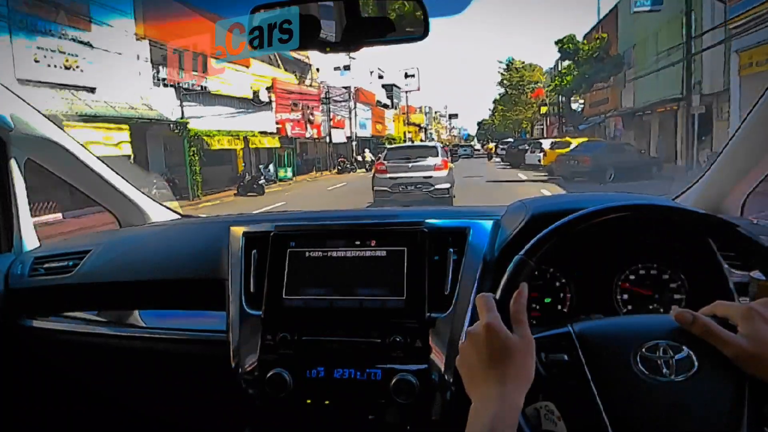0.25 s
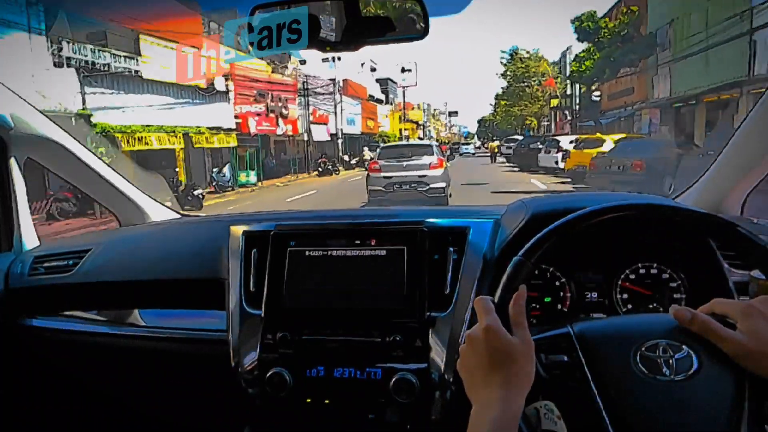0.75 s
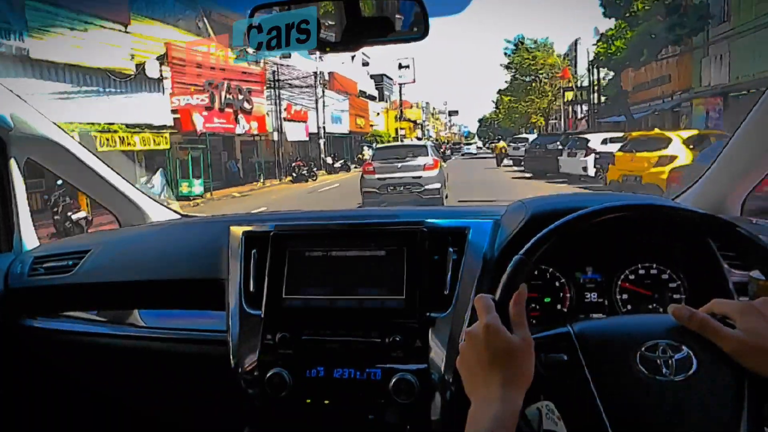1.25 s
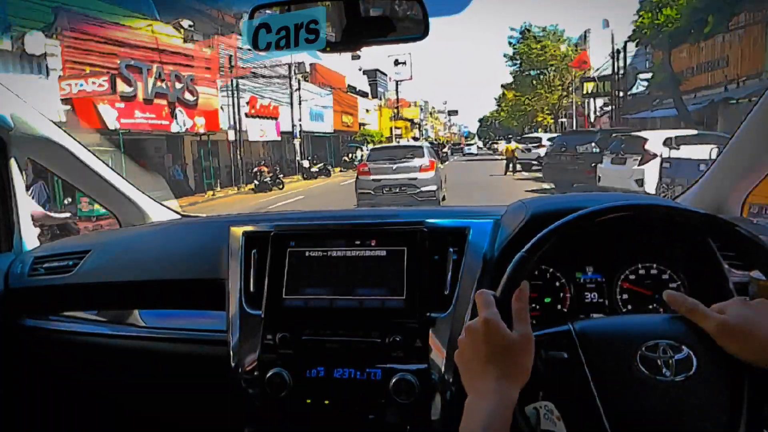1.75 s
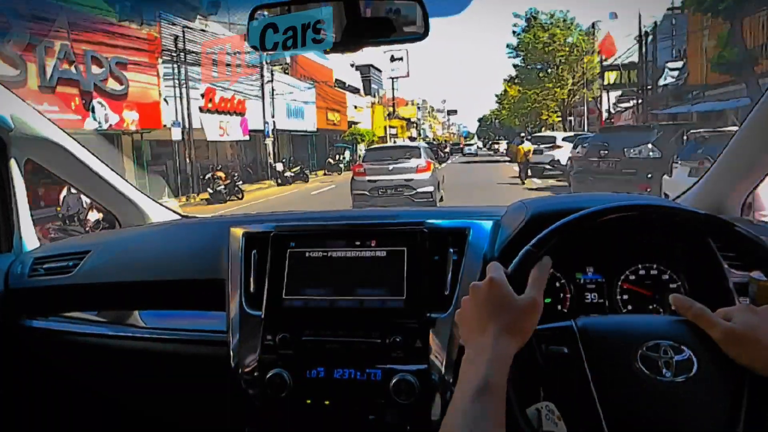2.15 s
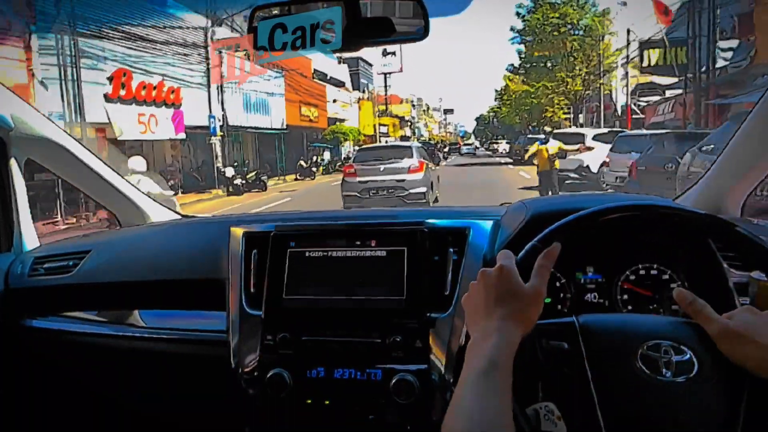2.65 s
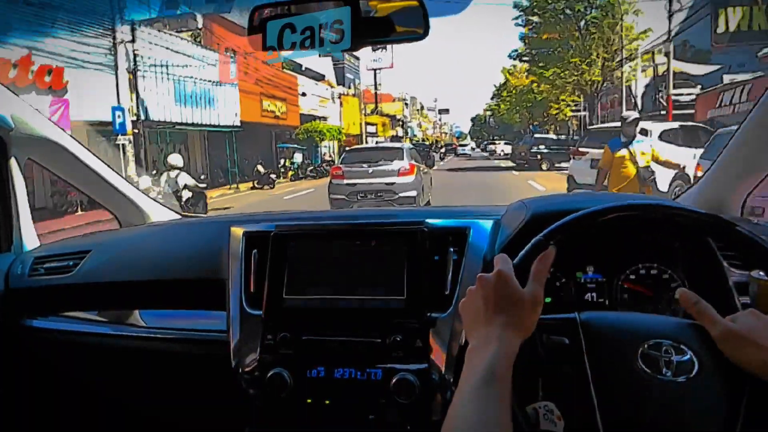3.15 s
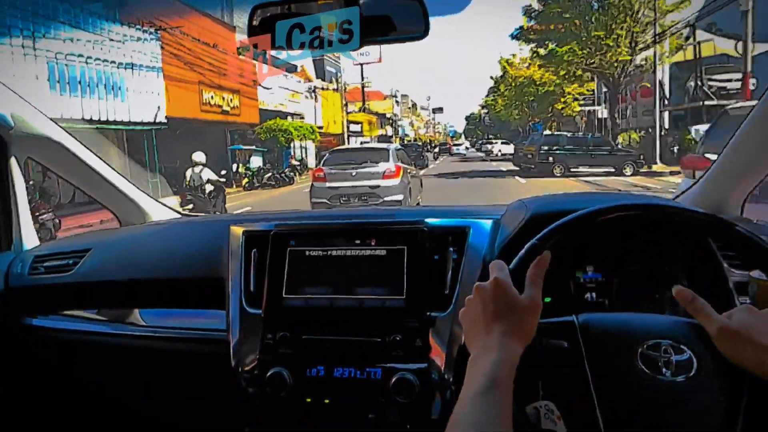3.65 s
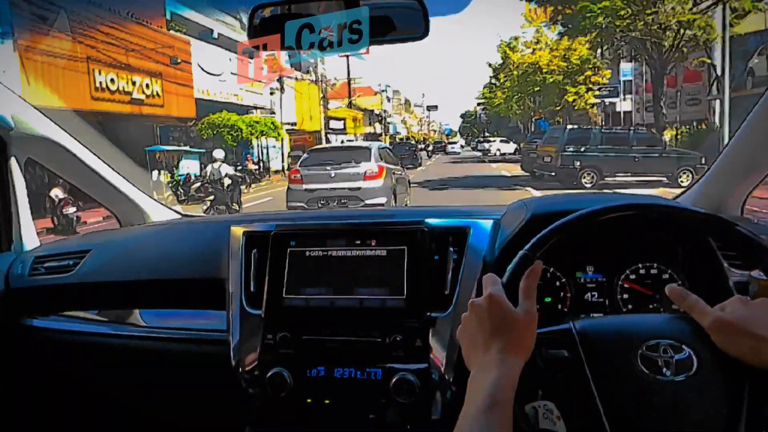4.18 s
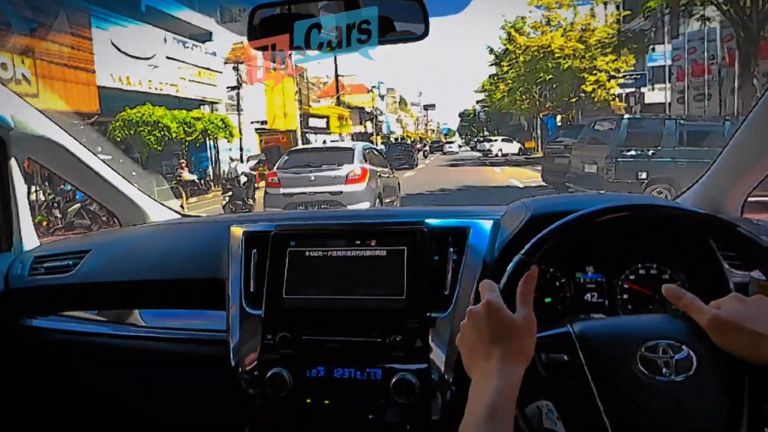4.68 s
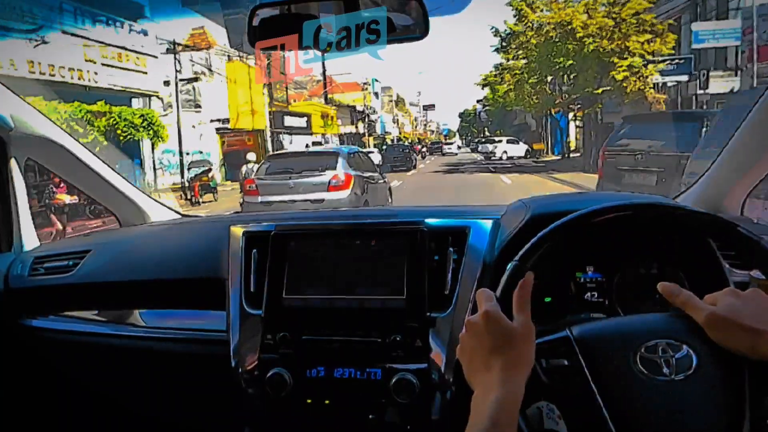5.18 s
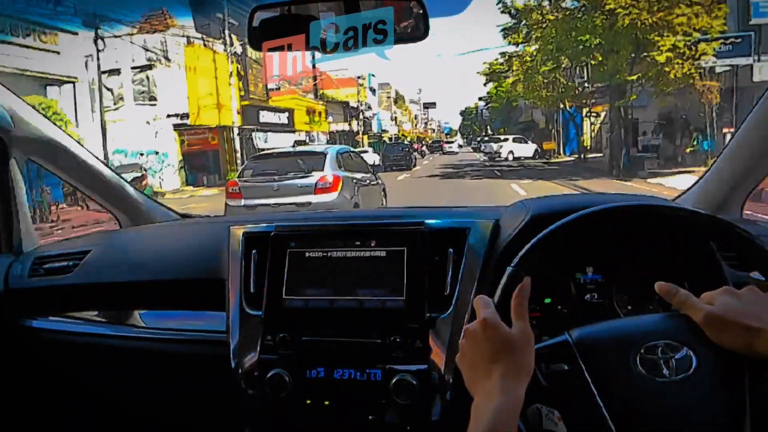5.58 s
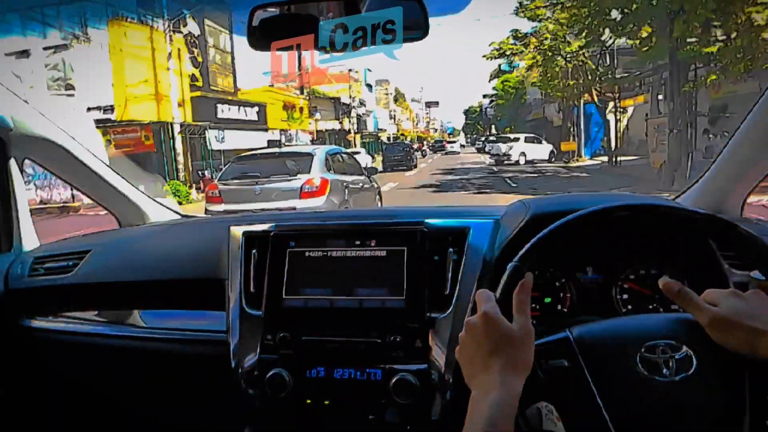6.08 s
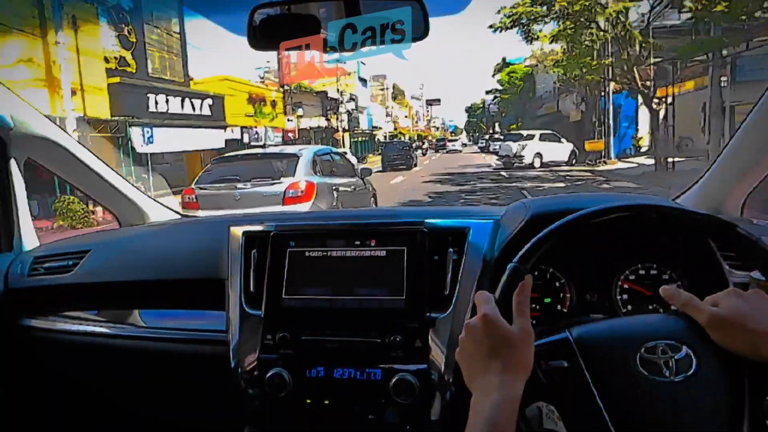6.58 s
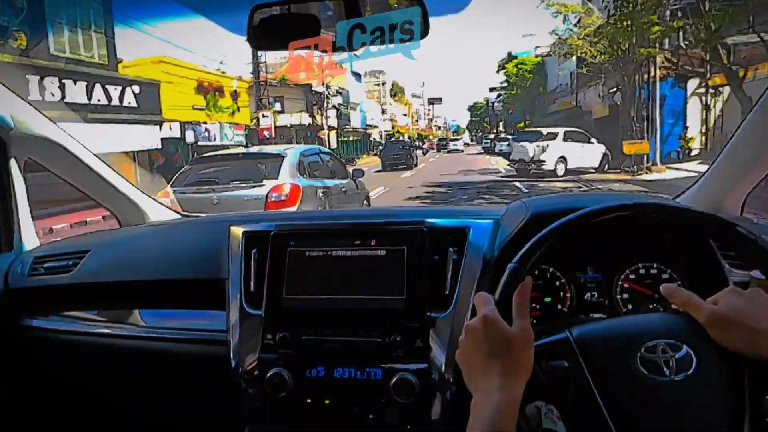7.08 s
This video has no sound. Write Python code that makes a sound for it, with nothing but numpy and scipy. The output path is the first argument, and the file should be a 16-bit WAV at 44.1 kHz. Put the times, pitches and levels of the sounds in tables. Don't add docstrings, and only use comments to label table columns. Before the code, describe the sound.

Heard from the dashboard inside a closed moving car: a continuous deep rumble that heaves unevenly with the road, booming in the cabin. Bumps cluster in the first second and a half, then come more spaced, the heaviest near three seconds. Soft suspension thuds, trim jolts, dashboard taps and tiny loose ticks scatter throughout; a hard plastic knock comes just after four seconds. Muffled tyre roar and thin microphone hiss stay underneath.

```python
import sys
import numpy as np
from scipy import signal
from scipy.fft import rfft, irfft, next_fast_len
from scipy.io import wavfile
from scipy.ndimage import uniform_filter1d, map_coordinates

SR = 44100
rng = np.random.default_rng(int(sys.argv[2]) if len(sys.argv) > 2 else 0)


def pcm_store(signal):
    levels = np.round(np.clip(np.atleast_2d(signal), -1, 1) * 32767)
    wavfile.write(sys.argv[1], SR, levels.astype(np.int16).T)


def voltage_ratio(level):
    return 10 ** (np.asarray(level, float) / 20)


N = 323253

# (time [s], unevenness [dB], grit [dB])
ROAD = [(0.0, -46, -56.5), (0.84, -40, -54), (1.04, -41, -55.5), (2.0, -45.5, -56), (2.2, -40.5, -55.5),
        (2.59, -47.5, -56.5), (2.86, -43, -58), (3.14, -43.5, -57), (3.45, -45, -55.5), (3.78, -46, -53.5),
        (4.35, -45, -54.5), (4.82, -42.5, -57), (5.2, -42, -53.5), (6.0, -46, -56.5), (6.27, -48, -53),
        (6.47, -43.5, -54.5), (6.88, -46, -53), (7.33, -45, -54.5)]
# (frequency [Hz], density [dB per Hz])
HEAVE_SPECTRUM = [(2, -10), (6, -15.5), (14, -5), (25, -5), (38, -7.5), (52, -14.5), (70, -41), (150, -120)]
# (frequency [Hz], width [Hz], level [dB])
CABIN_MODES = [(78, 15.1, 3), (106.6, 41, -7), (151.4, 47, -7), (219.3, 7.2, -7)]
# (frequency [Hz], density [dB per Hz])
SHELL_SPECTRUM = [(30, -34.5), (55, 1), (200, -11.5), (270, -15.5), (480, -21.5), (700, -41.5),
                  (1500, -120)]
# (frequency [Hz], width [Hz], level [dB])
PANEL_MODES = [(320, 40, -4), (374.3, 74, 1), (534.3, 63, -10)]
# (frequency [Hz], density [dB per Hz])
TYRE_SPECTRUM = [(260, -30.5), (450, -2.5), (565, -6.5), (715, -4), (775, -4), (878, -4.5), (1130, -7),
                 (1290, -12), (1430, -16), (1600, -20), (2600, -27), (3380, -42.5), (5720, -120)]
# (time of swing middle [s], peak [dB], swing [Hz], direction [+-1])
BUMPS = [(0.148, -27.5, 15, 1), (0.448, -34.5, 21, 1), (0.718, -25.5, 20, 1), (0.783, -35, 12, 1),
         (0.812, -33, 41, -1), (0.89, -24, 22, -1), (0.973, -33, 14, -1), (1.073, -23.5, 21.3, 1),
         (1.164, -34, 11, 1), (1.248, -25.5, 14.3, 1), (1.361, -32, 11.5, -1), (1.444, -34, 23, 1),
         (1.552, -27, 13, -1), (1.62, -27, 16, -1), (2.343, -28.5, 13, 1), (2.657, -22.5, 27, -1),
         (2.752, -29.5, 22, 1), (3.093, -19, 16.3, 1), (3.153, -30.5, 28, 1), (3.311, -29, 16, 1),
         (3.329, -26.5, 17, -1), (4.186, -27, 32.5, -1), (4.304, -32.5, 14, -1), (4.462, -26, 17, 1),
         (4.701, -28, 19, -1), (4.957, -26, 21, -1), (5.213, -26.5, 12, 1), (5.528, -33, 13.4, 1),
         (5.878, -30, 22, -1), (6.273, -28.5, 22, -1)]
# (time [s], peak [dB], pitch [Hz])
THUDS = [(0.133, -39, 174), (0.624, -39, 160), (0.705, -39.5, 168), (0.873, -42, 154), (0.963, -41, 166),
         (1.058, -42.5, 181), (1.531, -43, 134), (1.77, -40.5, 165), (2.083, -43, 137), (2.244, -44, 166),
         (2.332, -38.5, 210), (2.413, -43, 134), (2.644, -35, 154), (3.081, -31.5, 150), (4.311, -44, 158),
         (4.395, -41, 155), (4.439, -35.5, 151.4), (4.583, -50, 132), (4.689, -37.5, 204),
         (5.154, -40, 212), (6.06, -40, 182), (6.372, -39.5, 205), (6.458, -42, 148), (6.556, -38, 129),
         (6.598, -35.5, 174), (6.714, -33.5, 129), (6.924, -42, 212), (7.02, -42.5, 176), (7.186, -46, 146),
         (7.244, -42.5, 207)]
# (time [s], peak [dB], pitch [Hz])
JOLTS = [(0.13, -45.5, 369), (0.461, -36.5, 359), (0.616, -42, 288), (0.781, -40.5, 340),
         (0.863, -46.5, 421), (1.065, -47.5, 436), (1.35, -37, 393.6), (1.55, -41, 377),
         (2.087, -40.5, 357), (2.171, -47, 357), (2.214, -45, 353), (2.446, -45, 332), (2.641, -37.5, 407),
         (2.756, -42, 382), (2.799, -45, 383), (2.963, -44, 374), (3.444, -43.5, 376), (3.723, -44, 316),
         (4.313, -43.5, 308), (4.433, -39.5, 383), (4.83, -38, 368), (4.857, -46, 312), (5.097, -45.5, 360),
         (5.155, -41.5, 376), (5.57, -46, 324), (6.084, -46, 394), (6.371, -43.5, 329), (6.631, -45.5, 370),
         (6.821, -44, 400), (7.163, -39.5, 327)]
# (frequency [Hz], density [dB per Hz])
SHOVE_SPECTRUM = [(100, -25), (180, 3.5), (450, 0.5), (900, -20), (1400, -27.5), (3000, -53), (6000, -120)]
# (time [s], peak [dB], pitch [Hz])
TAPS = [(0.35, -47, 724), (0.469, -46, 537), (0.675, -48, 695), (0.733, -41.5, 693), (0.883, -38.5, 627),
        (1.164, -45, 1015), (1.235, -47, 700), (1.361, -44, 799), (1.44, -44, 856), (1.571, -39.5, 556),
        (1.617, -51, 570), (1.971, -46, 610), (2.646, -44, 567), (3.095, -49, 540), (3.304, -45.5, 683),
        (3.972, -54, 910), (4.447, -40.5, 662), (4.782, -40, 537), (4.856, -45, 884), (5.091, -48, 556),
        (5.178, -38.5, 546), (5.216, -47, 870), (5.852, -42, 660), (6.371, -45, 548), (6.53, -44, 760),
        (7.004, -46, 790)]
# (time [s], peak [dB])
KNOCKS = [
    (4.0427, -44.5),
    (4.0471, -54),
    (4.0492, -56),
]
# (frequency [Hz], level [dB], t60 [s])
PLASTIC_MODES = [(620, 8.5, 0.053), (783, 6.5, 0.045), (900, -7, 0.018), (1033, 12.5, 0.026),
                 (1270, 1, 0.015), (1530, -12, .02), (1720, -17, 0.017), (2065, -4.5, 0.048)]
# (time [s], peak [dB], low note [Hz], high note [Hz], crack [dB])
TICKS = [(0.28, -60, 1620, 3700, -12), (.42, -66, 3720, 4720, -8), (.528, -60, 1670, 3720, -13),
         (.735, -63, 2710, 3350, -8), (1.146, -64, 2400, 4800, -14), (1.157, -62, 2300, 2600, -8),
         (1.166, -58, 2060, 2460, -5), (1.1778, -51.5, 2060, 2950, -7), (1.243, -64, 2540, 2900, -7),
         (1.364, -69, 2850, 3600, -0.5), (1.382, -70, 3450, 3500, -14), (1.55, -73, 1700, 2500, -8),
         (2.645, -66, 1710, 2590, -3), (3.1, -69, 1980, 3520, -7), (3.155, -66, 2600, 4800, -9),
         (4.329, -64, 2500, 2800, -9), (4.581, -66, 1710, 2400, -7), (4.787, -65, 1600, 2020, -5),
         (4.968, -63, 2010, 2450, -6), (5.169, -59, 2350, 4630, -10), (5.807, -69, 1890, 2400, -5),
         (6.505, -62.5, 1630, 1640, -17), (6.74, -66, 4740, 4800, -3)]
# (frequency [Hz], level [dB], t60 [s])
FITTING_MODES = [(2950, -1, 0.043), (3450, -5.5, 0.13), (3830, 0, 0.033), (4250, 0, 0.029),
                 (4800, -12, 0.028), (5540, -5, .02)]
# (frequency [Hz], density [dB per Hz])
CRACK_SPECTRUM = [(500, -40), (1200, 5), (2200, 4.5), (5000, -7.5), (6300, -11), (7500, -22), (12000, -30)]
# (frequency [Hz], density [dB per Hz])
HISS_SPECTRUM = [(300, -65), (1500, -1), (3000, 3), (5000, 2), (8000, -0.5), (10900, -0.5), (11200, -3.5),
                 (16000, -4.5)]


def unit(x):
    return x / np.sqrt(np.mean(x ** 2) + 1e-20)


def curves(rows):
    time_s, *columns = np.transpose(rows)
    return [np.interp(np.arange(N) / SR, time_s, column) for column in columns]


def wobble(rate_hz):
    knots = rng.standard_normal(int(N * rate_hz / SR) + 4)
    return map_coordinates(knots, [np.arange(N) * rate_hz / SR])


def filtered(x, response):
    size = next_fast_len(N + SR // 2)
    spectrum = rfft(x, size) * response(np.fft.rfftfreq(size, 1 / SR))
    return irfft(spectrum, size)[:N]


def shaped(points):
    hz, db = np.transpose(points)
    return lambda f: voltage_ratio(np.interp(np.log(f + 1), np.log(hz + 1), db))


def resonant(modes):
    def response(f):
        power = 0
        for hz, width_hz, db in modes:
            power = power + voltage_ratio(2 * db) / (1 + (2 * (f - hz) / width_hz) ** 2) ** 2
        return np.sqrt(power)
    return response


def shaken(drive_db, response, patchy_db=0):
    cells = signal.stft(rng.standard_normal(N), nperseg=512)[2]
    patches = uniform_filter1d(rng.standard_normal(cells.shape), size=3, axis=0)
    patches = uniform_filter1d(patches, size=5, axis=1)
    noise = signal.istft(cells * voltage_ratio(patchy_db * unit(patches)), nperseg=512)[1][:N]
    return unit(filtered(voltage_ratio(drive_db) * noise, response))


def ring(modes, attack_s, scatter_db):
    t = np.arange(SR // 4) / SR
    tones = np.zeros(len(t))
    for hz, db, t60_s in modes:
        decay = voltage_ratio(db + rng.normal(0, scatter_db) - 60 * t / t60_s)
        tones += decay * np.sin(2 * np.pi * hz * t)
    return tones * (1 - np.exp(-(t / attack_s) ** 2))


def rub(length, t60_s, rise_s):
    t = np.arange(length) / SR
    swell = voltage_ratio(-60 * t / t60_s) * (1 - np.exp(-t / rise_s))
    return swell * rng.standard_normal(length)


def add(track, time_s, sound):
    start = round(time_s * SR)
    track[start:start + len(sound)] += sound


def road(strain):
    uneven_db, grit_db = (c - c.mean() for c in curves(ROAD))
    heave_db = -39 + uneven_db
    boom_db = -46 + 0.18 * uneven_db
    panel_db = -55.5 + grit_db
    roar_db = -62.5 + 0.6 * grit_db
    coarse_db = 1.08 * wobble(12) + 0.88 * wobble(35)

    heave_drive_db = 1.12 * coarse_db + 2.5 * wobble(25)
    heave = voltage_ratio(heave_db + 0.38) * shaken(heave_drive_db, shaped(HEAVE_SPECTRUM))

    boom_drive_db = 0.72 * coarse_db + 4 * strain
    boom = voltage_ratio(boom_db - 2.5) * shaken(boom_drive_db, resonant(CABIN_MODES))

    shell_drive_db = 0.65 * coarse_db + 5 * strain
    shell = voltage_ratio(boom_db - 3.5) * shaken(shell_drive_db, shaped(SHELL_SPECTRUM), patchy_db=1.13)

    panel_drive_db = coarse_db + 4 * strain + 1.4 * wobble(25)
    panel = voltage_ratio(panel_db - 1.6) * shaken(panel_drive_db, resonant(PANEL_MODES))

    roar_drive_db = 0.57 * coarse_db + 4 * strain + 0.89 * wobble(50)
    roar = voltage_ratio(roar_db + 1.85) * shaken(roar_drive_db, shaped(TYRE_SPECTRUM), patchy_db=2.0)
    return heave + boom + shell + panel + roar


def bumps():
    air, strain = np.zeros(N + SR), np.zeros(N + SR)
    t = np.arange(-SR // 10, SR // 10) / SR
    for time_s, db, hz, direction in BUMPS:
        phase = 2 * np.pi * hz * t
        swing = phase * np.exp(0.5 - phase * phase / 2)
        add(air, time_s - 0.1, np.sign(direction) * voltage_ratio(db) * swing)
        add(strain, time_s - 0.1, voltage_ratio(db + 22) * np.exp(-phase * phase / 3))
    return air[:N], strain[:N]


def suspension_thuds():
    out = np.zeros(N + SR)
    for time_s, db, hz in THUDS:
        modes = [(hz, 3, 0.13), (0.532 * hz, -5, 0.15)]
        add(out, max(time_s - 0.008, 0), voltage_ratio(db) * ring(modes, attack_s=0.0081, scatter_db=0.95))
    return out[:N]


def trim_jolts():
    out, shoves = np.zeros(N + SR), np.zeros(N + SR)
    for time_s, db, hz in JOLTS:
        start_s = max(time_s - 0.004, 0)
        modes = [(hz, 2.5, 0.13), (0.797 * hz, -5, 0.08)]
        add(out, start_s, voltage_ratio(db) * ring(modes, attack_s=0.0065, scatter_db=1.5))
        add(shoves, start_s, voltage_ratio(db + 15) * rub(SR // 10, t60_s=0.08, rise_s=0.0045))
    return out[:N] + filtered(shoves[:N], shaped(SHOVE_SPECTRUM))


def dashboard_taps():
    out = np.zeros(N + SR)
    for time_s, db, hz in TAPS:
        modes = [(hz, -0.7, 0.04), (0.94 * hz, -4, 0.03), (1.236 * hz, -5, 0.03), (1100, -13, 0.03)]
        add(out, time_s - 0.0025, voltage_ratio(db) * ring(modes, attack_s=0.0029, scatter_db=1.5))
    return out[:N]


def plastic_knock():
    out, cracks = np.zeros(N + SR), np.zeros(N + SR)
    t = np.arange(SR // 20) / SR
    for time_s, db in KNOCKS:
        add(cracks, time_s, voltage_ratio(db - 8 - 60 * t / 0.015) * rng.standard_normal(len(t)))
        add(out, time_s, -voltage_ratio(db) * ring(PLASTIC_MODES, attack_s=0.00062, scatter_db=2.2))
    return out[:N] + filtered(cracks[:N], shaped(CRACK_SPECTRUM))


def fitting_ticks():
    out, cracks = np.zeros(N + SR), np.zeros(N + SR)
    for time_s, db, low_hz, high_hz, crack_db in TICKS:
        ring_db = -14 + 0.97 * (db + 62)
        metal = [(hz, level_db + ring_db, t60_s) for hz, level_db, t60_s in FITTING_MODES]
        notes = [(low_hz, -2, 0.04), (high_hz, -2, 0.035)]
        add(out, time_s - 0.0015, voltage_ratio(db) * ring(notes + metal, attack_s=0.001, scatter_db=2.0))
        crack = rub(SR // 20, t60_s=0.046, rise_s=0.0032)
        add(cracks, time_s - 0.0015, voltage_ratio(db + crack_db + 16) * crack)
    return out[:N] + filtered(cracks[:N], shaped(CRACK_SPECTRUM))


def microphone_hiss():
    drive_db = 0.17 * wobble(12) + 0.12 * wobble(5.1)
    return voltage_ratio(-71) * shaken(drive_db, shaped(HISS_SPECTRUM), patchy_db=1.3)


def high_whine():
    harmonic = np.arange(33, 46)[:, None]
    level_db = -105.5 + 0.6 * (harmonic - 36) + 2.4 * (harmonic % 4 == 1)
    tones = np.sin(2 * np.pi * harmonic * np.arange(N) / 128)
    return np.sum(voltage_ratio(level_db) * tones, axis=0)


def scene():
    air, strain = bumps()
    struck = suspension_thuds() + trim_jolts() + dashboard_taps()
    rattles = plastic_knock() + fitting_ticks()
    return (road(strain) + air + struck + rattles)[None]


def roll_off(x):
    return signal.sosfilt(signal.butter(12, 16020, fs=SR, output="sos"), x)


def record(dry):
    mix = dry[0] + microphone_hiss() + high_whine()
    limited = filtered(mix, lambda hz: np.where(hz < 15725, 1, voltage_ratio(-30)))
    return roll_off(limited[None])


dry = scene()
out = record(dry)
pcm_store(out)
```